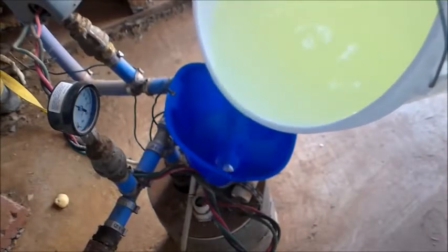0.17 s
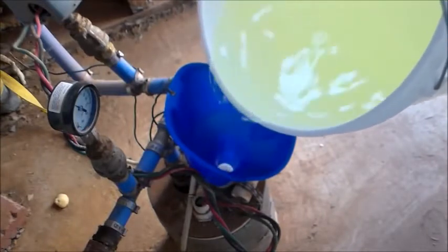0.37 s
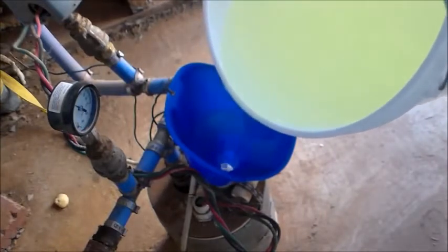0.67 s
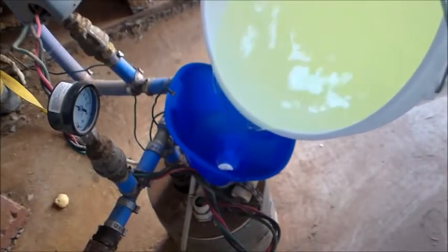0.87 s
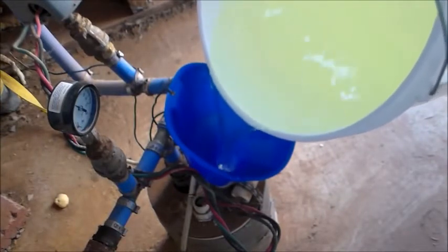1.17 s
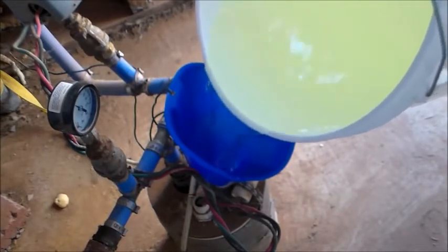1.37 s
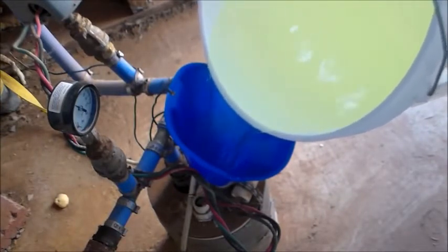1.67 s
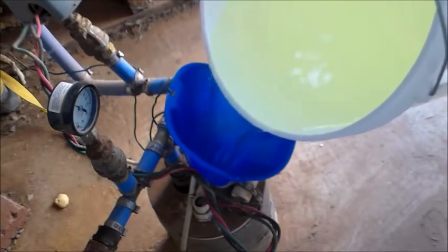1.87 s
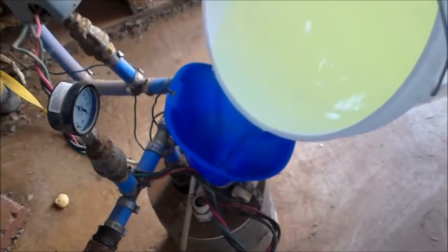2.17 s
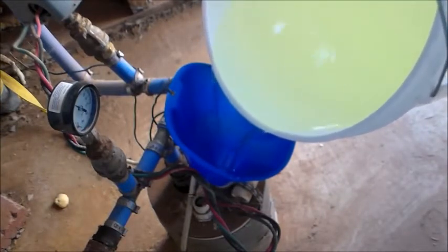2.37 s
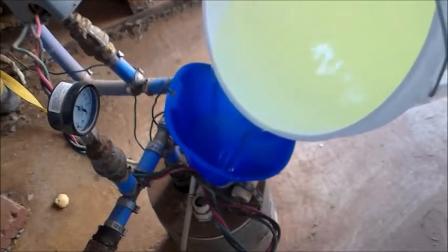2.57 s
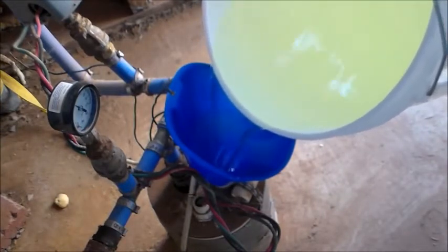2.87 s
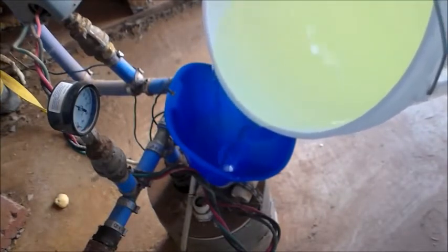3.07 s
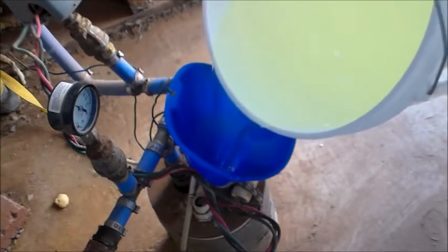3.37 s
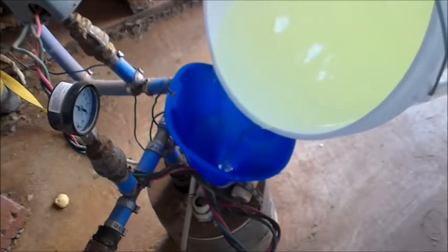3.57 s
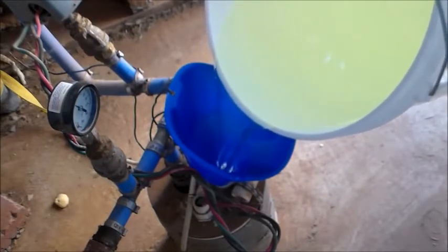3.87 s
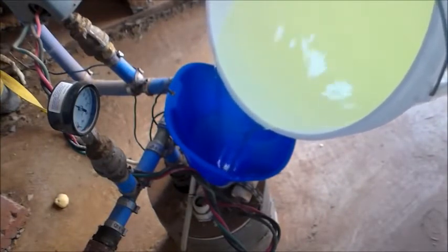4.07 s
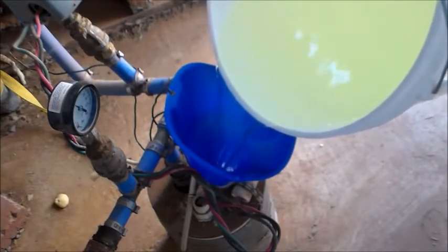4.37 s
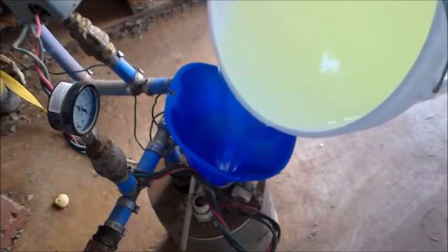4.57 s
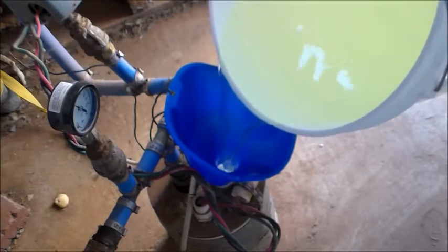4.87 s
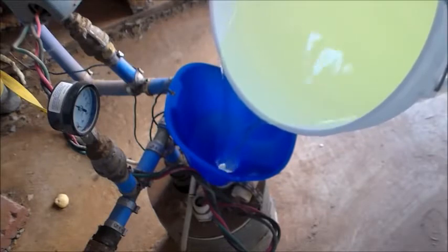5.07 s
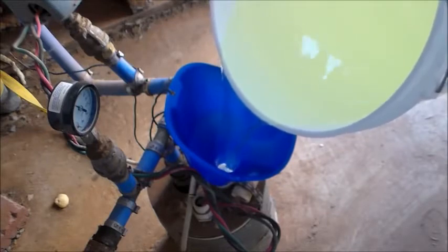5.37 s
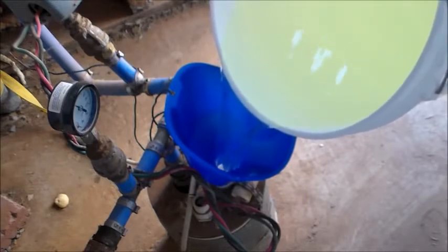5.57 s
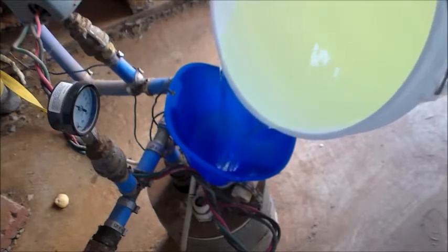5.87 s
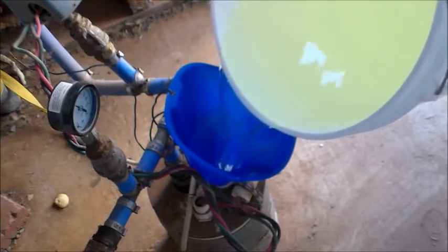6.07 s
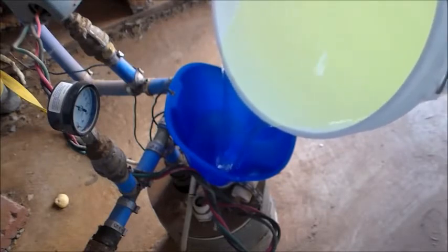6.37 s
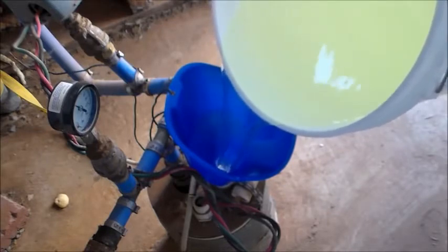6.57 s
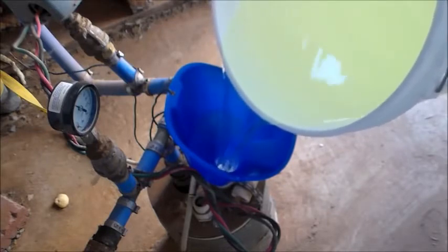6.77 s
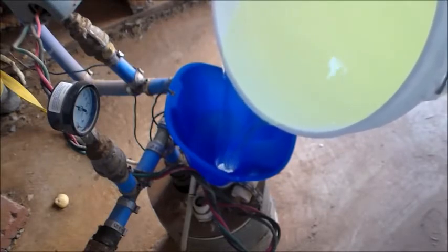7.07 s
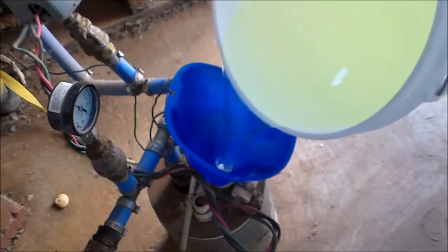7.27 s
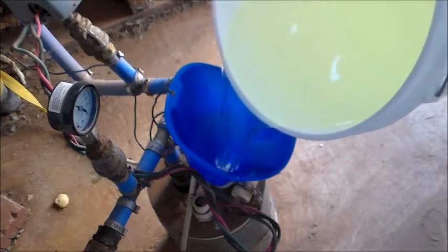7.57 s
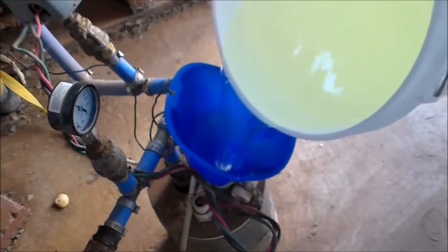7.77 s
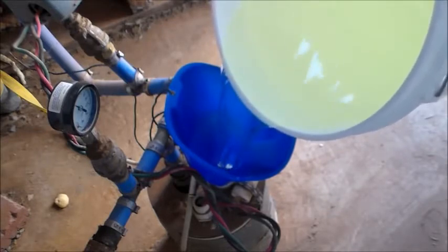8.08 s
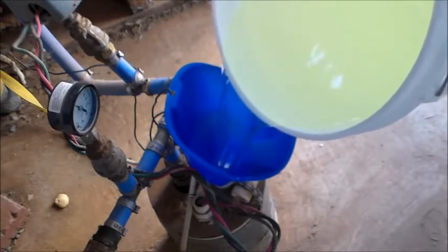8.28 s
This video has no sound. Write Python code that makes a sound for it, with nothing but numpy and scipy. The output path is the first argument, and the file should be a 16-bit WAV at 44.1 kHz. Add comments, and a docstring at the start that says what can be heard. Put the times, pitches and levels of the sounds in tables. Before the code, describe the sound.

Outdoors, a faint low rumble and hum come first; within a third of a second, liquid begins to spatter lightly into a plastic funnel. The stream thickens near two seconds into bright, busy bubbling with wet slaps and plinks, while the funnel neck rings hollow and the pipe below gurgles. It eases around six seconds, then gushes again. Close microphone, moderately wide treble.

```python
"""A low outdoor rumble with a faint hum, and after a moment liquid slaps into a plastic funnel on a narrow well pipe.
Close to the microphone, the stream from a bucket spatters on the funnel wall and traps bubbles, more with every gush
as the bucket sloshes: swarms of decaying sines, crackle and noise bursts. Damped resonances make the throat ring
hollow, and a repeating echo colours the pipe's gurgles as each load runs down. The rumble and hum stay underneath."""
import sys
import numpy as np
from scipy import signal
from scipy.fft import rfft, irfft, next_fast_len
from scipy.io import wavfile
from scipy.ndimage import map_coordinates

SR = 44100
rng = np.random.default_rng(int(sys.argv[2]) if len(sys.argv) > 2 else 0)


def generate_wav(sig):
    """Save sig (samples, or channels by samples) to the path in sys.argv[1] as 16-bit PCM at SR."""
    pcm = np.round(np.clip(np.atleast_2d(sig).T, -1, 1) * 32767).astype(np.int16)
    wavfile.write(sys.argv[1], SR, pcm)


N = 372204  # length in samples

# single loud bubbles: start_s, pitch_hz, strength_db
LOUD_BUBBLES = [(0.9615, 3400, -32), (1.095, 3380, -34), (1.124, 6700, -26.5), (1.15, 2920, -25),
                (1.204, 2210, -28.5), (1.876, 677, -25.5), (1.971, 755, -23.5), (1.988, 1690, -23.5),
                (2.138, 3240, -23.5), (2.152, 3530, -22.5), (2.162, 2700, -21.5), (2.204, 1636, -30),
                (2.242, 3060, -25.5), (2.332, 2706, -23.5), (2.671, 2850, -26), (2.825, 3650, -23.5),
                (2.948, 2550, -23.5), (3.173, 2670, -28), (3.258, 3360, -24.5), (3.347, 720, -28.5),
                (3.35, 1320, -33), (3.535, 2860, -27.5), (3.571, 2220, -33), (3.733, 2835, -22.5),
                (3.969, 1476, -24), (4.009, 3720, -25.5), (4.329, 2210, -27.5), (4.345, 2230, -25.5),
                (4.408, 3080, -31), (4.422, 3500, -27), (4.482, 3330, -23), (4.587, 1950, -23),
                (4.601, 3620, -23), (4.614, 2550, -28), (4.645, 2950, -27), (4.7, 6230, -23.5),
                (4.957, 2900, -26), (5.605, 5960, -24.5), (6.127, 3500, -27.5), (6.393, 3820, -20),
                (6.409, 3340, -14.5), (6.457, 1890, -26), (6.471, 3220, -26), (6.765, 3380, -23.5),
                (7.177, 3420, -25.5), (7.944, 3270, -27), (8.337, 1830, -14.5), (8.36, 1386, -20.5),
                (8.404, 1750, -20), (8.428, 4100, -20)]
# lumps of liquid on the plastic, big ones low and small drops high: start_s, level_db (before the mix), pitch_hz
WALL_SLAPS = [(0.3, -39, 880), (0.367, -45, 7140), (0.446, -41.5, 3060), (0.542, -48, 5850),
              (0.663, -41, 9500), (0.688, -39.5, 3920), (0.899, -43.5, 1410), (0.961, -41.5, 3600),
              (1.118, -38, 8900), (2.070, -30.5, 1230), (2.947, -39, 2100), (3.343, -32, 1330),
              (3.733, -34.5, 2600), (3.780, -26.5, 9900), (3.955, -37, 1900), (4.377, -34, 1110),
              (4.586, -38.5, 2880), (4.795, -36, 1230), (5.781, -36.5, 3050), (6.126, -42, 3620),
              (6.764, -37.5, 2960), (7.042, -34, 7950), (7.415, -36, 1690), (7.765, -40, 3400),
              (8.266, -34.5, 2660)]
# loads running from the funnel down the pipe: start_s, length_s, level_db (at their own pitch), pitch_hz
GURGLES = [(1.835, 0.21, -55, 905), (2.726, 0.75, -60.5, 460), (4.762, 0.04, -53, 570),
           (5.218, 0.55, -54.5, 420), (5.76, 0.23, -57, 237), (6.437, 0.47, -62, 240),
           (7.36, 0.17, -54, 388)]
# air resonances in the funnel's neck: centre_hz, width_hz, relative_db
THROAT_MODES = [(623.3, 18, -0.5), (692.6, 36, -0.5), (717.3, 13.5, 1.5)]
# air resonances of the pipe: centre_hz, width_hz, relative_db
PIPE_MODES = [(159, 30, 1), (277, 34, 1), (331, 48, -2.5), (446, 66, 1.5), (503, 42, 6), (851, 22, 4),
              (946, 29, 7.5), (1206, 41, -2)]
# stereo spread, wider in the treble: frequency_hz, side_db (relative)
STEREO_WIDTH = [(100, -11.5), (300, -2), (600, -13.5), (1200, -7), (2600, -9), (4500, 2.5), (8000, 7.5),
                (14000, 6.5)]

GURGLE_ATTACK_S = 0.012


def amp(db):
    """Decibels to gain."""
    return 10 ** (np.asarray(db) / 20)


def unit(x):
    """Scale to rms 1."""
    return x / np.sqrt(np.mean(x ** 2) + 1e-20)


def along(points, hz):
    """Read (Hz, value) points on a log axis."""
    f, v = np.transpose(points)
    return np.interp(np.log(hz + 1), np.log(f + 1), v)


def wobble(rate):
    """A smooth random curve, rate knots a second."""
    knots = rng.standard_normal(int(N * rate / SR) + 4)
    return map_coordinates(knots, [np.arange(N) * rate / SR])


def filtered(x, response):
    """x times a complex response of frequency."""
    size = next_fast_len(N + SR // 2, True)
    hz = np.fft.rfftfreq(size, 1 / SR)
    return irfft(rfft(x, size) * response(hz), size)[..., :N]


def coloured(x, spectrum, size=1024):
    """Causal filter of energy 1 with the given spectrum's shape, so that attacks stay sharp."""
    gain = amp(along(spectrum, np.fft.rfftfreq(size, 1 / SR)))
    # folding the cepstrum onto positive times gives the minimum-phase kernel
    cepstrum = irfft(np.log(gain))
    cepstrum[1:size // 2] *= 2
    cepstrum[size // 2 + 1:] = 0
    kernel = irfft(np.exp(rfft(cepstrum)))
    return signal.oaconvolve(x, kernel / np.linalg.norm(kernel))[:N]


def ringing(x, modes):
    """x through a set of damped resonances; a wider mode dies sooner."""
    t = np.arange(SR // 5) / SR
    kernel = np.zeros(len(t))
    for hz, width, db in modes:
        decay = 2 * np.pi * width / SR * np.exp(-np.pi * width * t)
        kernel += amp(db) * decay * np.cos(2 * np.pi * hz * t)
    return signal.oaconvolve(x, kernel)[:N]


def bubble_train(times, hz, sizes, cycles, rise, swell, size):
    """Each bubble swells, rings for some cycles and climbs in pitch as it nears the surface."""
    t = np.arange(size) / SR
    turns = hz[:, None] * t
    age = turns / cycles
    envelope = np.exp(-age) * (1 - np.exp(-turns / swell))
    tone = np.sin(2 * np.pi * turns * (1 + rise * np.tanh(age / 2)))
    waves = sizes[:, None] * envelope * tone
    index = (times[:, None] * SR).astype(int) + np.arange(size)
    return np.bincount(index.ravel(), waves.ravel(), N)[:N]


def crackle(rate, spread_db, hiss):
    """Tiny impacts of uneven size, rate a second, over a smooth hiss, rms 1."""
    when, rarity, sign = rng.random((int(rate * N / SR), 3)).T
    excess = np.minimum(-np.log(rarity), 2 * np.e)
    sizes = amp(spread_db * excess) * np.sign(sign - .5)
    impacts = unit(np.bincount((when * N).astype(int), sizes, N))
    return unit(impacts + hiss * rng.standard_normal(N))


def cloud(rate, low_hz, high_hz, cycles, spread_db, clump_db=0.0, count=6):
    """A swarm of random bubbles between two pitches, rms 1; those of like size come in brief clumps."""
    when, place, rarity = rng.random((int(rate * N / SR), 3)).T
    times = when * N / SR
    hz = low_hz * (high_hz / low_hz) ** place
    # a random map over pitch and time, 20 knots a second
    knots = rng.standard_normal((count, int(20 * N / SR) + 2))
    clumps = map_coordinates(knots, [place * (count - 1), 20 * times], order=1)
    sizes = unit(amp(clump_db * clumps - spread_db * np.log(rarity)))
    sizes = np.tanh(sizes / np.pi)  # no bubble grows far beyond the rest
    return unit(bubble_train(times, hz, sizes, cycles, rise=0.028, swell=0.18, size=500))


def splashes(rate, life, depth):
    """The stream breaks into lumps: sudden surges, rate a second, that die away over life seconds, rms 1."""
    kicks = (rng.random(N) < rate / SR) * rng.random(N)
    return unit(1 + depth * signal.lfilter([1], [1, -np.exp(-1 / (life * SR))], kicks))


def puff(hz, q, t60, t):
    """A sudden burst of noise around one pitch that dies away."""
    band = signal.lfilter(*signal.iirpeak(hz, q, SR), rng.standard_normal(len(t)))
    return unit(band) * amp(-60 * t / t60)


def excited_db(hz, own_hz):
    """How strongly a lump of liquid with its own pitch excites a sound at hz: 4.5 dB less an octave away."""
    return -4.5 * np.log2(hz / own_hz) ** 2


def following(lumps, attack, release, even_db, growth, flutter_db, typical_hz):
    """Gain of one sound: it grows with the flow (dB per dB), and each lump's swell rises, holds and dies away."""
    # strength of the pour: time_s, flow_db
    pour = [(0.59, -71), (0.74, -48), (0.93, -64.5), (1.08, -66.5), (1.14, -52.5), (1.5, -55.5),
            (1.85, -48.5), (2.41, -48), (2.6, -44.5), (3.2, -46), (3.3, -50.5), (4.17, -50), (4.72, -50),
            (4.95, -48), (5.81, -47.5), (6.08, -52), (6.59, -54.5), (7.42, -49.5), (7.66, -48), (7.73, -56),
            (7.9, -55.5), (8.44, -47)]
    even_flow_db, first_liquid_s = -50, 0.3
    flutters_per_s, step_s = 17, 0.002
    t = np.arange(0, N / SR, step_s)
    flow_db = np.interp(t, *np.transpose(pour)) - even_flow_db
    flutter = map_coordinates(rng.standard_normal(len(t)), [t * flutters_per_s])
    power = amp(even_db + growth * flow_db + flutter_db * flutter) ** 2 * (t > first_liquid_s)
    for s, length, db, own_hz in lumps:
        rising = np.clip((t - s) / attack, 0, 1)
        dying = np.exp(-np.maximum(t - s - length, 0) / release)
        power += (amp(db + excited_db(typical_hz, own_hz)) * rising * dying) ** 2
    return np.interp(np.arange(N) / SR, t, np.sqrt(power))


def in_funnel(**law):
    """Gain of a sound in the funnel, swelling as the bucket sloshes and each gush churns in air."""
    # gushes from the bucket: start_s, length_s, level_db (at their own pitch), bubble_pitch_hz
    bucket_gushes = [(0.358, 0.1, -53.5, 3670), (0.688, 0.081, -48, 4970), (0.728, 0.05, -48, 1180),
                     (1.112, 0.016, -51, 5460), (1.187, 0.023, -44.5, 1120), (1.443, 0.016, -46.5, 3860),
                     (1.616, 0.27, -44.5, 2820), (1.786, 0.058, -44.5, 4060), (1.847, 0.14, -40.5, 1400),
                     (2.074, 0.2, -39.5, 1950), (2.662, 0.12, -46, 5460), (2.737, 0.25, -47.5, 1270),
                     (3.1, 0.17, -44, 2420), (3.334, 0.014, -48, 1300), (3.507, 0.089, -42.5, 2010),
                     (3.733, 0.017, -43, 3600), (3.815, 0.094, -48, 4140), (3.943, 0.035, -43, 1920),
                     (4.079, 0.059, -49.5, 2900), (4.316, 0.042, -38, 2070), (4.374, 0.035, -39.5, 2210),
                     (4.46, 0.027, -45, 4670), (4.571, 0.056, -37.5, 2700), (4.774, 0.03, -43.5, 1540),
                     (4.907, 0.022, -47.5, 7000), (5.516, 0.088, -44, 1250), (5.767, 0.091, -46.5, 990),
                     (6.129, 0.055, -49, 5130), (6.366, 0.13, -42, 3430), (6.726, 0.1, -48, 3200),
                     (7.184, 0.099, -46.5, 3900), (7.42, 0.16, -49, 1400), (7.62, 0.033, -54, 4200),
                     (7.95, 0.15, -52.5, 6200), (8.25, 0.037, -40, 2300), (8.326, 0.09, -39.5, 1790)]
    return following(bucket_gushes, attack=0.0083, release=0.041, **law)


def in_pipe(**law):
    """Gain of a sound in the pipe, swelling with each gurgle."""
    return following(GURGLES, GURGLE_ATTACK_S, release=0.36, **law)


def stream():
    """Large and small bubbles and fine spray, surging together; the spray also spits in brief flurries."""
    # spectrum shape of the large bubbles: frequency_hz, relative_db
    large_tone = [(300, -47.5), (600, -4), (900, -10.5), (1300, -4), (2100, 3), (2700, -1.5), (4500, -1)]
    # spectrum shape of the small bubbles: frequency_hz, relative_db
    small_tone = [(1000, -42.5), (2000, -29.5), (2600, -4.5), (3600, -3.5), (4500, -6), (6000, -17),
                  (9000, -13)]
    # spectrum shape of the spray: frequency_hz, relative_db
    spray_tone = [(1500, -11), (4000, -1.5), (6600, -3), (7800, -6.5), (10000, -5.5), (12000, -8),
                  (14500, -12.5)]
    large_gain = in_funnel(even_db=-52, growth=1, flutter_db=1.5, typical_hz=1603)
    small_gain = in_funnel(even_db=-49, growth=1, flutter_db=1.1, typical_hz=3400)
    spray_gain = in_funnel(even_db=-52, growth=0.9, flutter_db=2.67, typical_hz=7995)

    large = cloud(520, 857, 2647, cycles=6, spread_db=3, clump_db=1)
    large += 0.5 * crackle(700, spread_db=3, hiss=0.4)
    small = cloud(600, 2362, 5650, cycles=8, spread_db=3, clump_db=2.1)
    small += 0.5 * crackle(900, spread_db=4.5, hiss=0.4)
    droplets = crackle(1200, spread_db=3, hiss=1) * splashes(14, life=.007, depth=2.2)
    spray = cloud(350, 4897, 13220, cycles=18, spread_db=2.5, clump_db=6.5) + 2 * droplets

    mix = amp(-2) * large_gain * unit(coloured(large, large_tone))
    mix += amp(-0.64) * small_gain * unit(coloured(small, small_tone))
    mix += amp(5) * spray_gain * unit(coloured(spray, spray_tone))
    return splashes(50, life=.007, depth=.6) * mix


def breaks(length, depth_db):
    """Gain of the stream: it necks down just before each lump lands or a big bubble is trapped."""
    t = np.arange(N) / SR
    landings = np.sort([row[0] for row in WALL_SLAPS + LOUD_BUBBLES] + [np.inf])
    wait = landings[np.searchsorted(landings, t)] - t
    return amp(-depth_db * np.exp(-wait / length))


def slaps():
    """Lumps hit the wall: a snap at their own pitch, a wet burst, a tick of spray and a soft plop in the throat."""
    # spectrum shape of the wet burst: frequency_hz, relative_db
    burst_tone = [(250, -68), (700, -1), (1300, -12), (2000, -4), (3600, -9), (6000, -12.5), (14000, -25)]
    plop_hz, burst_hz, snap_hz, tick_hz = 650, 2140, 3400, 9200  # typical pitches, which set each part's share
    snap, burst, tick, push = np.zeros((4, N + SR))
    t = np.arange(SR // 5) / SR
    for s, db, own_hz in WALL_SLAPS:
        span = slice(round(s * SR), round(s * SR) + len(t))
        snap[span] += amp(db + excited_db(snap_hz, own_hz)) * puff(own_hz, q=3.9, t60=0.085, t=t)
        burst_db = db + excited_db(burst_hz, own_hz) - 60 * t / 0.07  # falls 60 dB in 70 ms
        burst[span] += amp(burst_db) * rng.standard_normal(len(t))
        tick_db = db + excited_db(tick_hz, own_hz) - 60 * t / 0.018
        tick[span] += amp(tick_db) * rng.standard_normal(len(t))
        push[span.start] += amp(db + excited_db(plop_hz, own_hz))
    # the trapped pocket of air drives the throat
    pocket = ringing(push[:N], [(663, 40, 0)])
    plop = ringing(pocket, THROAT_MODES)
    plop *= push.max() / abs(plop).max()
    ticks = coloured(tick[:N], [(3000, -19), (7500, -6), (10500, 8), (14500, -3)])
    return snap[:N] + coloured(burst[:N], burst_tone) + ticks, plop


def loud_bubbles():
    """Now and then one bubble plinks above the swarm."""
    times, hz, db = np.transpose(LOUD_BUBBLES)
    cycles = 7 * (hz[:, None] / 2500) ** 0.45  # small bubbles ring for more cycles
    return bubble_train(times, hz, amp(db), cycles, rise=0.02, swell=2.6, size=1500)


def pops():
    """A bubble's skin bursts at the surface: a crisp tick of a few cycles."""
    # bursting bubbles: start_s, pitch_hz, strength_db
    surface_pops = [(0.593, 7400, -29.5), (0.663, 9000, -29), (3.735, 5150, -32), (3.746, 4740, -30),
                    (3.7809, 10200, -18.5), (4.687, 6300, -27), (4.907, 11200, -20), (5.274, 6130, -32),
                    (7.018, 10100, -18.5), (7.043, 9150, -23)]
    times, hz, db = np.transpose(surface_pops)
    return bubble_train(times, hz, amp(db), cycles=4, rise=0.03, swell=1.5, size=300)


def hollow():
    """The plunging stream drums on the air in the funnel's neck and in the pipe below; a full neck rings less."""
    neck = unit(ringing(cloud(170, 599, 797, cycles=6.5, spread_db=1.5), THROAT_MODES))
    # the level in the funnel shifts the neck's pitch: reading faster and slower bends it
    drift, drifts_per_s = 0.01394, 5  # share of the pitch
    reading = np.arange(N) + drift * SR / drifts_per_s * wobble(drifts_per_s)
    neck = map_coordinates(neck, [reading], order=1)

    deep_gain = in_pipe(even_db=-76.5, growth=1, flutter_db=3, typical_hz=233)
    shallow_gain = in_pipe(even_db=-72, growth=0, flutter_db=5.5, typical_hz=534)
    deep = crackle(400, spread_db=4.5, hiss=0.17)
    deep = coloured(deep, [(80, -12.5), (150, -1.5), (330, -3), (450, -12.5)])
    shallow = crackle(400, spread_db=5.5, hiss=1)
    shallow = coloured(shallow, [(330, -21.5), (450, -5.5), (1100, -2), (1800, -19.5)])
    pipe = deep_gain * unit(ringing(deep, PIPE_MODES))
    pipe += amp(-1.5) * shallow_gain * unit(ringing(shallow, PIPE_MODES))

    choke_db = -46.5  # a shallow gurgle this strong fills the neck and halves the power of its ring
    neck_gain = in_funnel(even_db=-54.5, growth=0.58, flutter_db=1.6, typical_hz=708)
    neck_gain = neck_gain / np.hypot(1, shallow_gain / amp(choke_db))
    return neck_gain * neck + down_the_pipe(pipe + churn() + gulps())


def churn():
    """While a load runs down, bubbles rattle inside the pipe's mouth."""
    gain = following(GURGLES, GURGLE_ATTACK_S, release=0.076,
                     even_db=-68, growth=0.5, flutter_db=5.5, typical_hz=424)
    return amp(-0.5) * gain * cloud(260, 945, 2033, cycles=7.3, spread_db=2.5)


def gulps():
    """A slug of liquid drops into the pipe with a low thump that rings its air."""
    # slugs of liquid: start_s, level_db (before the pipe's ring), pitch_hz
    slugs = [(2.072, -46, 330), (4.38, -48.5, 490), (4.788, -45.5, 526), (5.783, -43, 217),
             (7.415, -46.5, 394)]
    out, t = np.zeros(N + SR), np.arange(SR // 2) / SR
    for s, db, hz in slugs:
        out[round(s * SR):][:len(t)] += amp(db) * puff(hz, q=2.1, t60=0.21, t=t)
    return ringing(out[:N], PIPE_MODES)


def down_the_pipe(x):
    """Sound runs down the pipe and a share comes back, again and again, which makes it hollow."""
    round_trip_s, back = 0.03714, 0.65
    level = np.sqrt(1 - back ** 2)  # offsets the power that the echoes add
    return filtered(x, lambda hz: level / (1 - back * np.exp(-2j * np.pi * hz * round_trip_s)))


def echoes(x, count):
    """Short scatter from the ground and nearby walls, as decaying noise that fades faster in the treble."""
    # decay of the scatter: frequency_hz, t60_s
    wall_decay = [(300, 0.27), (2500, 0.13), (12000, 0.071)]
    hz, t, z = signal.stft(rng.standard_normal((count + 1, SR // 4)), SR, nperseg=128)
    fading = amp(-60 * t / along(wall_decay, hz)[:, None]) * (1 - np.exp(-t / 0.00058))
    tails = signal.istft(z * fading, SR, nperseg=128)[1]
    # fresh random tails crossfade, so no one tail colours the whole sound
    hop = N // count + 1
    padded, out = np.pad(x, (hop, 2 * hop)), np.zeros(N + 3 * hop + SR)
    for k, tail in enumerate(tails):
        piece = padded[k * hop:(k + 2) * hop] * np.sqrt(np.hanning(2 * hop))
        scatter = signal.fftconvolve(piece, tail / np.linalg.norm(tail))
        out[k * hop:][:len(scatter)] += scatter
    return out[hop:hop + N]


def background():
    """Outdoor rumble of shaped noise and a wavering 60 Hz hum, as mid and side."""
    # spectrum shape of the rumble: frequency_hz, relative_db
    rumble_tone = [(15, -41), (28, 4), (64, -3.5), (80, -8), (110, -18), (200, -26.5), (380, -25.5),
                   (600, -34), (14000, -45.5)]

    def response(hz):
        width = np.array([np.ones(len(hz)), amp(along(STEREO_WIDTH, hz))])
        return amp(along(rumble_tone, hz)) * width

    rumble = filtered(rng.standard_normal((2, N)), response)
    rumble = amp(-53.5) * rumble / np.std(rumble[0])
    hum = np.sin(2 * np.pi * 60 * np.arange(N) / SR + 0.85 * wobble(6)) * amp(1.8 * wobble(8.1))
    return rumble + amp(-54.5) * hum * np.array([[1], [.12]])


def scene():
    """The splashing rings in the bowl and scatters; the treble spreads wider than the bass."""
    # air resonances of the funnel's bowl: centre_hz, width_hz, relative_db
    bowl_modes = [(1356, 45, -0.5), (1587, 74, -2.5), (1700, 23, -0.5), (1875, 32, 2.5), (2206, 66, -6),
                  (2935, 40, -16.5), (3510, 110, -6.5)]
    slap, plop = slaps()
    flow = breaks(length=0.062, depth_db=1)
    splash = flow * stream() + slap
    splash = amp(-3.5) * (splash + ringing(splash, bowl_modes))
    splash = splash + loud_bubbles() + pops()
    air = flow * hollow() + plop
    mid = splash + amp(-4.5) * echoes(splash, count=80) + air
    left_and_right = 1.53 * splash * wobble(250)  # drops land left and right of the centre
    scattered = echoes(splash + air, count=80) + left_and_right
    side = filtered(scattered, lambda hz: amp(along(STEREO_WIDTH, hz) - 13))
    mid, side = np.array([mid, side]) + background()
    return np.array([mid + side, mid - side])


def record(dry):
    """A steep low-pass at 14.2 kHz: the sound has almost nothing above it."""
    return filtered(dry, lambda hz: 1 / np.sqrt(1 + (hz / 14200) ** 200))


dry = scene()
out = record(dry)
generate_wav(out)
```